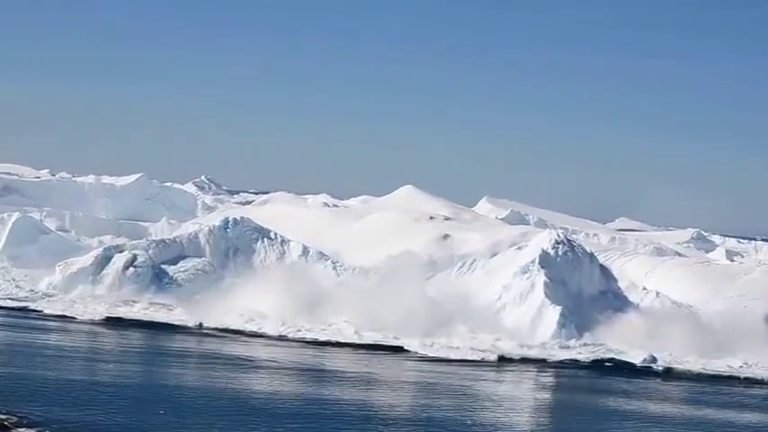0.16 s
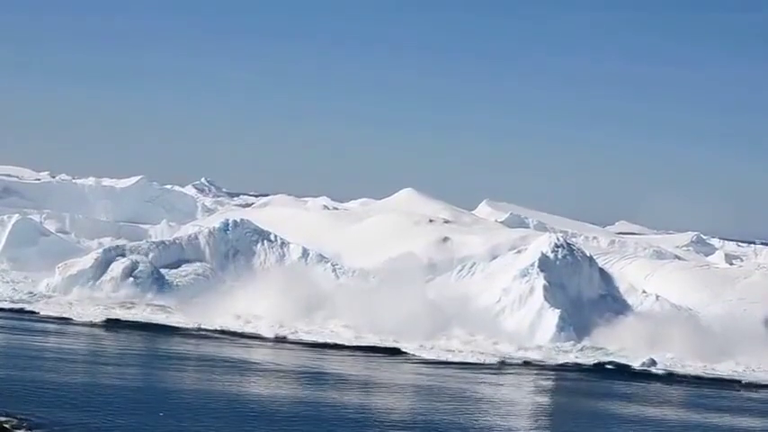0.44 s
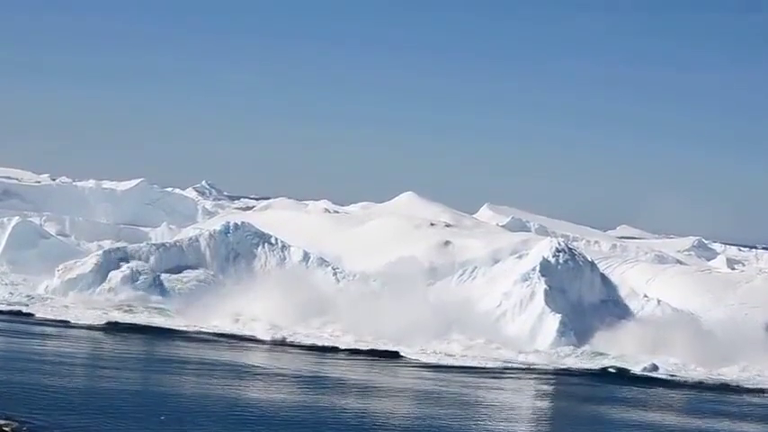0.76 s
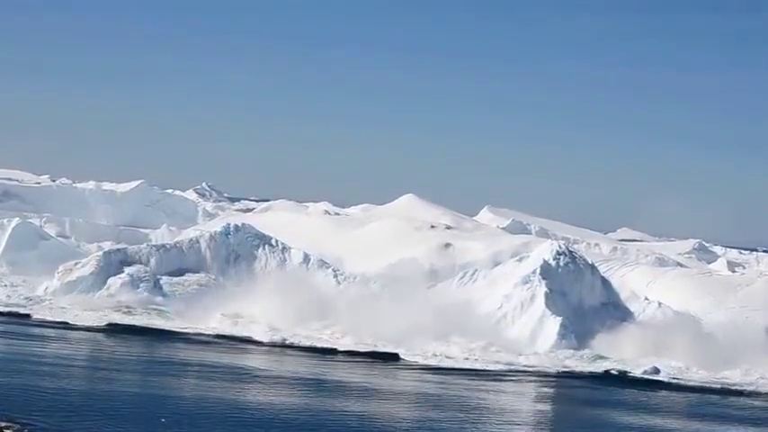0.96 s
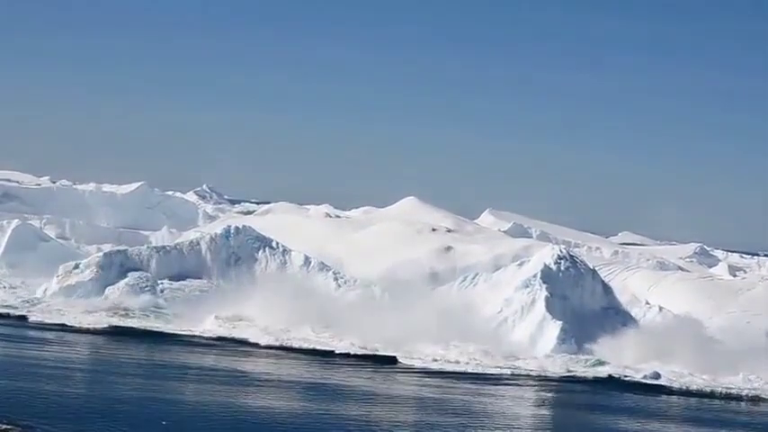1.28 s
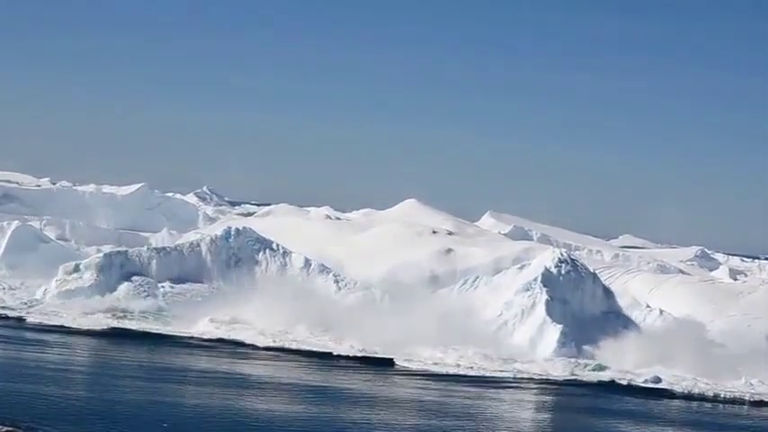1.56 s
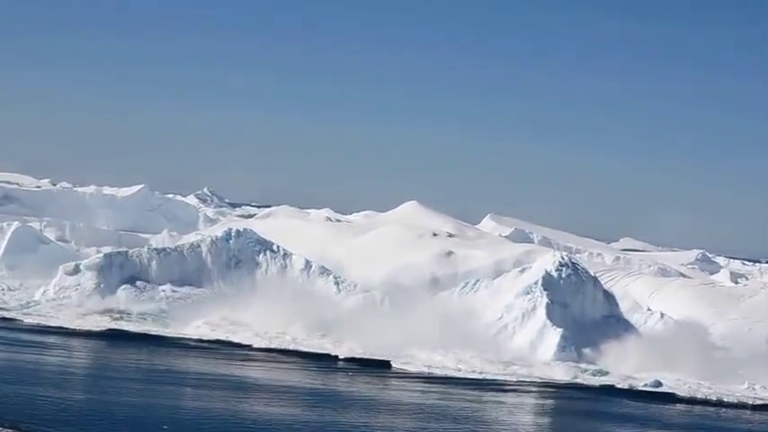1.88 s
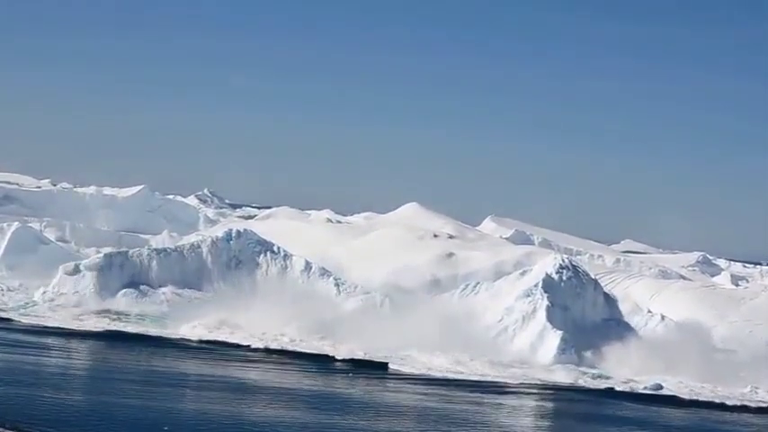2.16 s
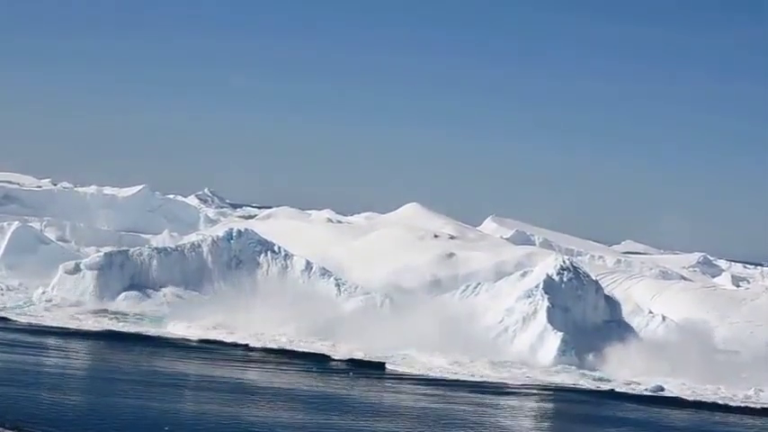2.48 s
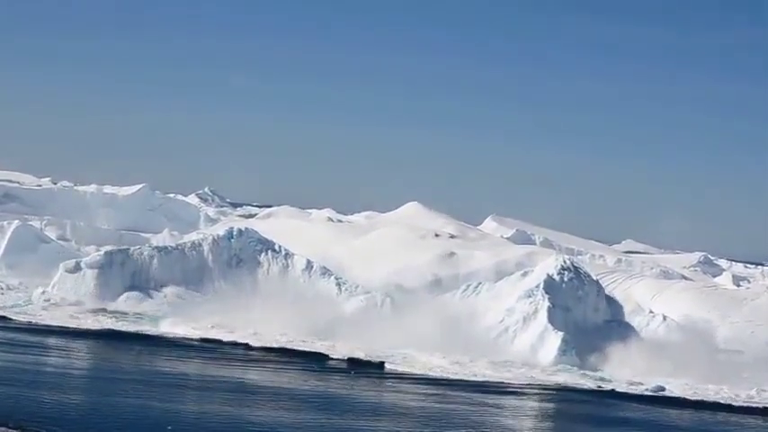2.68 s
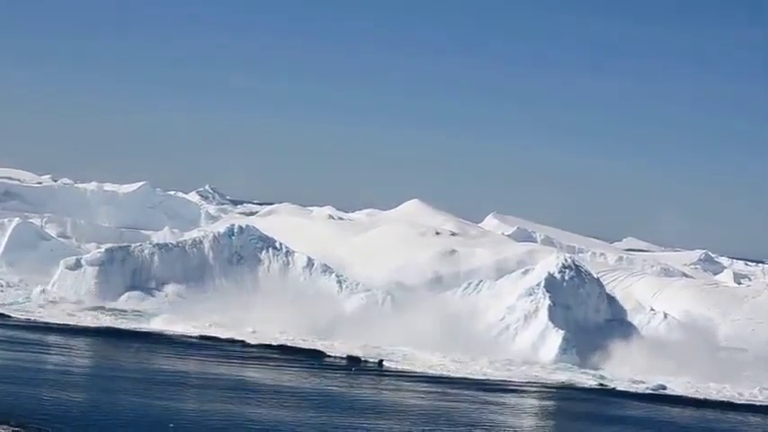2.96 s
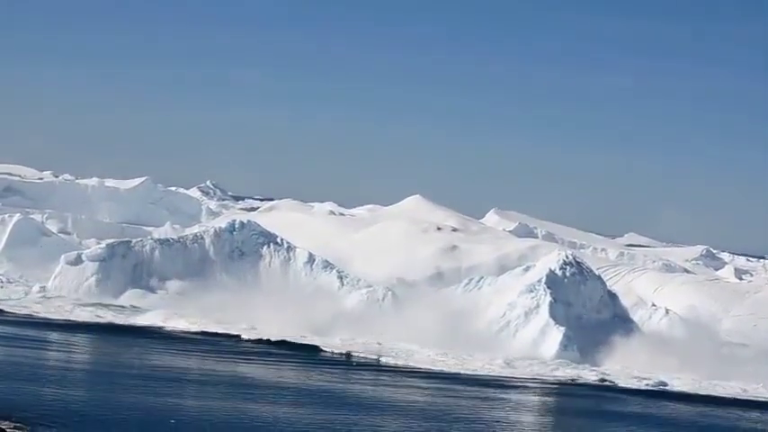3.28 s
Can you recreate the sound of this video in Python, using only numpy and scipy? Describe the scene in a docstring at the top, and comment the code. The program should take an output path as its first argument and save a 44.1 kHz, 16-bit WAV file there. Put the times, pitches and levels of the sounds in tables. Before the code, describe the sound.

Steady dull roar of a distant rolling iceberg and churning water, with low rumble beneath.

```python
"""Calm open water, heard from a boat: far away an iceberg rolls over.
Falling ice and churned water, made of shaped noise and random splashes, merge into a steady, dull roar.
Under it lie a low rumble of shaped noise and a few soft thuds and knocks made of short sine swells.
A hard surface near the microphone hollows the roar; a few tiny ticks of ringing noise sound close by,
over faint microphone hiss."""
import sys
import numpy as np
from scipy import signal
from scipy.fft import rfft, irfft
from scipy.io import wavfile

SR = 44100
rng = np.random.default_rng(int(sys.argv[2]) if len(sys.argv) > 2 else 0)


def transcribe(signal):
    """Save signal, clipped to [-1, 1], as a 16-bit WAV file at the path in sys.argv[1]."""
    frames = np.atleast_2d(signal).T
    limited = np.clip(frames, -1, 1)
    pcm = np.round(limited * 32767).astype(np.int16)
    wavfile.write(sys.argv[1], SR, pcm)


N = 151263  # length in samples

# Colour of the churned ice and water before hollowing. Each row: frequency in Hz, relative density in dB.
ROAR_SPECTRUM = [(200, -27), (300, -14.5), (440, -2), (520, -1.5), (700, 0), (790, 2), (950, -2.5),
                 (1300, -2.5), (1500, -5), (1750, -9.5), (1980, -17), (2250, -14), (2600, -20), (3000, -33),
                 (3400, -42), (3750, -42), (4300, -55), (4800, -56.5), (5500, -67), (7000, -89),
                 (12000, -120)]
# Strength of the roar. Each row: time in seconds, rms level in dB.
ROAR_LEVEL = [(0, -24.5), (.65, -24.5), (1.07, -25.5), (1.27, -24.4), (1.55, -24.5), (1.8, -25),
              (2.0, -24.5), (2.4, -24.5), (2.9, -25.5), (3.43, -26)]
# Colour of the rolling mass. Each row: frequency in Hz, relative density in dB.
RUMBLE_SPECTRUM = [(15, -33), (25, -28), (40, -19), (50, -27.5), (70, -13.5), (98, -6), (130, -4.5),
                   (182, 1), (222, -1), (255, -.5), (303, -7.5), (340, -2.5), (385, -15.5), (500, -17.5),
                   (900, -71.5), (3000, -120)]
# Strength of the rumble. Each row: time in seconds, rms level in dB.
RUMBLE_LEVEL = [(0, -30), (.6, -31), (.92, -31), (1.4, -31.5), (2.5, -32), (3.43, -32)]
# Colour of the microphone hiss. Each row: frequency in Hz, relative density in dB.
HISS_SPECTRUM = [(5500, 0), (6600, -1.5), (9800, -1.5), (11500, -5), (15500, -8)]
# Tiny close ticks. Each row: start in seconds, peak level in dB, centre in Hz, decay time in seconds.
TICKS = [(.045, -61, 6000, 0.0051), (.051, -58, 5970, .005), (.093, -65.5, 7000, .003),
         (.108, -69, 12500, .004), (.12, -66.5, 10500, 0.0065), (.205, -69, 6500, .002),
         (.9150, -45, 8160, .0006), (3.236, -64, 7000, 0.0046)]
# Blocks that plunge or knock together. Each row: start in seconds, pitch in Hz, peak of the swell in dB.
THUDS = [(1.395, 62, -37), (1.715, 72, -37), (1.918, 790, -21.5), (1.944, 74, -36.5), (2.033, 790, -17),
         (2.075, 99, -36.5), (2.885, 141, -25), (3.276, 135, -28.5)]

# Single splashes that stand out of the wash; the share is of its power.
SPLASHES_PER_S, SPLASH_SPREAD_DB, SPLASH_SHARE = 2500, 2.14, .18
# The band that the nearby reflection cancels, and the gain left at its centre.
HOLLOW_HZ, HOLLOW_WIDTH_HZ, HOLLOW_DB = 605.3, 219, -16
ROAR_FLICKER_DB, RUMBLE_FLICKER_DB = .09, .2  # rms wander of the level
HISS_DB = -79.5  # rms level
TICK_WIDTH_HZ = 6500  # of each of the two resonances in a row
TICK_TAIL_DB, TICK_TAIL_S = -22, .013
THUD_RISE_CYCLES = 1.7
EDGE_S, CUTOFF_HZ = .004, 15500


def from_db(db):
    """Decibels to gain."""
    return 10 ** (np.asarray(db) / 20)


def rms_one(x):
    """Scale to rms 1."""
    return x / np.sqrt(np.mean(x ** 2) + 1e-20)


def in_time(rows):
    """Join (seconds, value) rows by straight lines."""
    return np.interp(np.arange(N) / SR, *np.transpose(rows))


def coloured(x, spectrum):
    """Filter a steady sound along a curve of (Hz, dB) points, straight over log frequency; rms 1."""
    hz, db = np.transpose(spectrum)
    bins = np.maximum(np.fft.rfftfreq(N, 1 / SR), 1)
    gain = from_db(np.interp(np.log(bins), np.log(hz), db))
    return rms_one(irfft(rfft(x) * gain, N))


def drift(rate):
    """Slow random wander, mostly below `rate` Hz; rms 1."""
    bins = np.fft.rfftfreq(N, 1 / SR)
    lowpass = 1 / (1 + (bins / rate) ** 2)
    return rms_one(irfft(rfft(rng.standard_normal(N)) * lowpass, N))


def resonance(x, hz, width_hz):
    """One resonance with gain 1 at its centre."""
    b, a = signal.iirpeak(hz, hz / width_hz, fs=SR)
    return signal.lfilter(b, a, x)


def roar():
    """Countless splashes over a smooth wash, dulled by distance and hollowed by a nearby reflection."""
    born = rng.random(N) < SPLASHES_PER_S / SR
    size_db = SPLASH_SPREAD_DB * np.minimum(rng.exponential(1, N), 4)
    splashes = rms_one(born * from_db(size_db) * rng.choice([-1, 1], N))
    smooth = rng.standard_normal(N)
    mix = np.sqrt(SPLASH_SHARE) * splashes + np.sqrt(1 - SPLASH_SHARE) * smooth
    wash = coloured(mix, ROAR_SPECTRUM)

    # Taking a resonance away leaves a dip in the spectrum.
    hollow_band = resonance(wash, HOLLOW_HZ, HOLLOW_WIDTH_HZ)
    hollowed = wash - (1 - from_db(HOLLOW_DB)) * hollow_band
    level_db = in_time(ROAR_LEVEL) + ROAR_FLICKER_DB * drift(rate=20)
    return rms_one(hollowed) * from_db(level_db)


def rumble():
    """The turning mass as low noise with a slightly lumpy level."""
    low_noise = coloured(rng.standard_normal(N), RUMBLE_SPECTRUM)
    level_db = in_time(RUMBLE_LEVEL) + RUMBLE_FLICKER_DB * drift(rate=8)
    return low_noise * from_db(level_db)


def hiss():
    """Steady microphone noise, faint and high."""
    return from_db(HISS_DB) * coloured(rng.standard_normal(N), HISS_SPECTRUM)


def ticks():
    """Bright little snaps: decaying noise through two equal resonances, each with a faint, short tail."""
    out = np.zeros(N)
    for start_s, peak_db, hz, decay_s in TICKS:
        since_start = np.arange(N) / SR - start_s
        age = np.maximum(since_start, 0)
        tail = from_db(TICK_TAIL_DB) * np.exp(-age / TICK_TAIL_S)
        fall = np.exp(-age / decay_s) + tail
        burst = rng.standard_normal(N) * (since_start >= 0) * fall
        snap = resonance(resonance(burst, hz, TICK_WIDTH_HZ), hz, TICK_WIDTH_HZ)
        out += from_db(peak_db) * snap / np.abs(snap).max()
    return out


def thuds():
    """Each distant blow is a sine that swells and dies within a few cycles."""
    out = np.zeros(N)
    for start_s, hz, peak_db in THUDS:
        cycles = np.maximum(np.arange(N) / SR - start_s, 0) * hz
        age = cycles / THUD_RISE_CYCLES
        swell = (age * np.exp(1 - age)) ** 2  # reaches 1 at age 1
        tone = np.sin(2 * np.pi * (cycles + rng.random()))
        out += from_db(peak_db) * swell * tone
    return out


def scene():
    """Roar, rumble, ticks and thuds over faint hiss, in mono."""
    mono = roar() + rumble() + hiss() + ticks() + thuds()
    return mono[None]


def record(dry):
    """Open and close the sound with short fades and cut the top steeply."""
    to_nearest_end = np.minimum(np.arange(N), np.arange(N)[::-1])
    edges = np.sin(np.pi / 2 * np.minimum(to_nearest_end / (EDGE_S * SR), 1)) ** 2
    # order 10, 0.1 dB ripple, 80 dB down above the cutoff
    lowpass = signal.ellip(10, .1, 80, CUTOFF_HZ, fs=SR, output="sos")
    return signal.sosfilt(lowpass, dry * edges)


dry = scene()
out = record(dry)
transcribe(out)
```